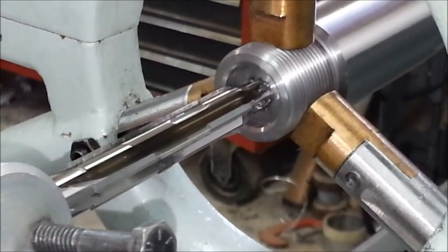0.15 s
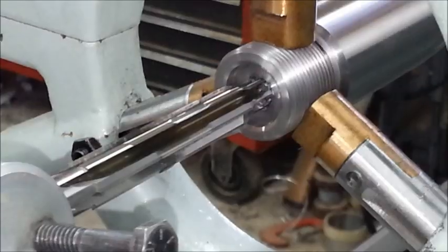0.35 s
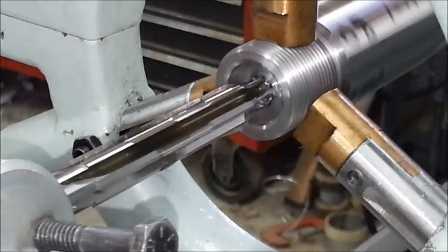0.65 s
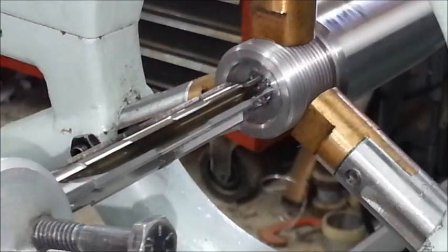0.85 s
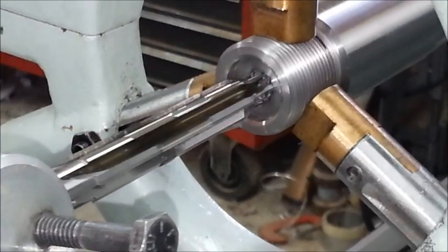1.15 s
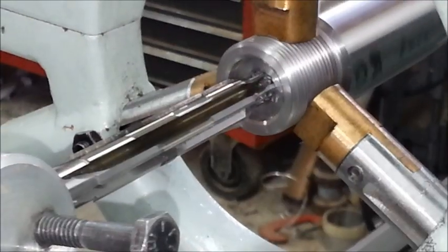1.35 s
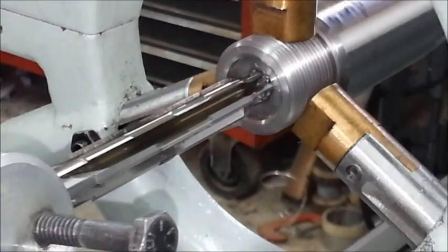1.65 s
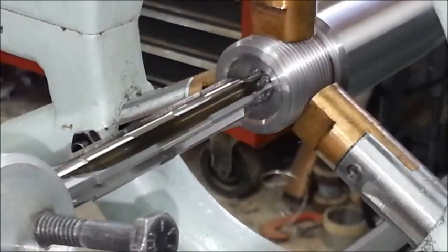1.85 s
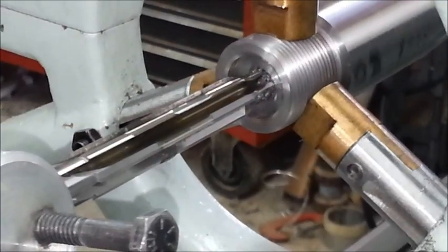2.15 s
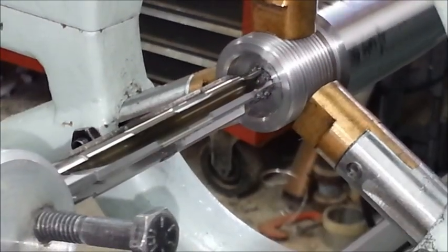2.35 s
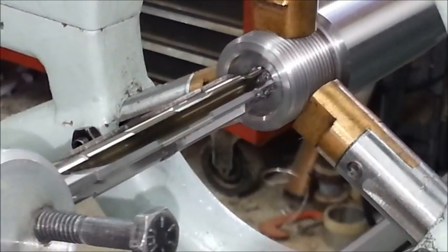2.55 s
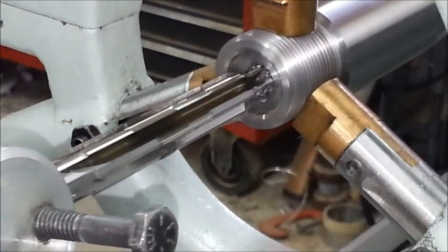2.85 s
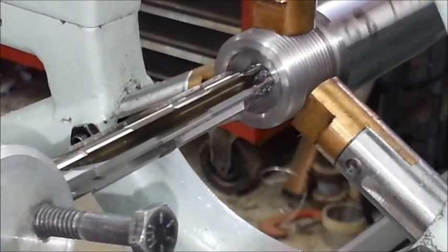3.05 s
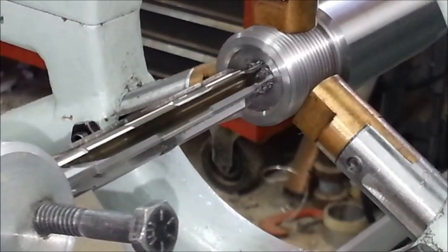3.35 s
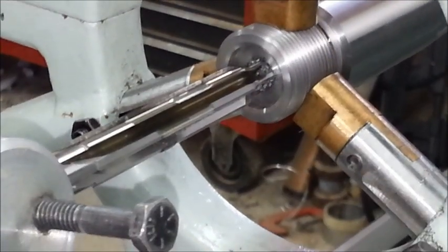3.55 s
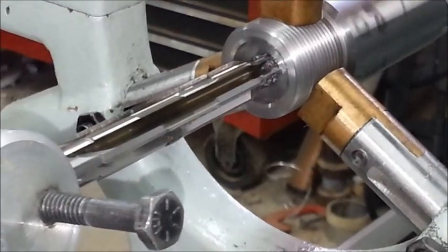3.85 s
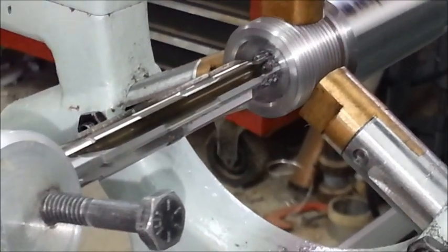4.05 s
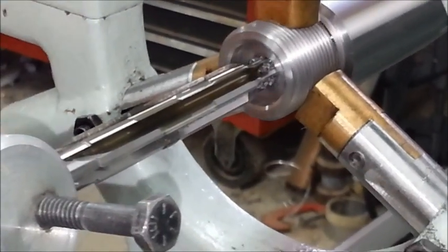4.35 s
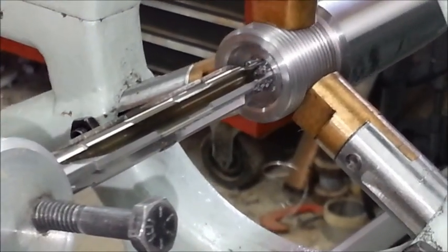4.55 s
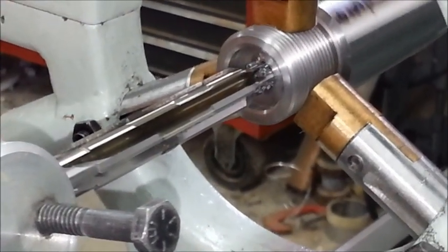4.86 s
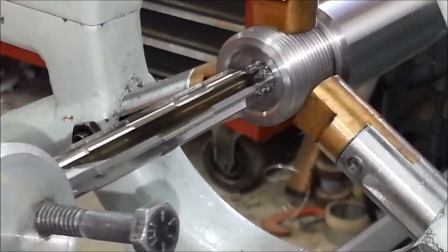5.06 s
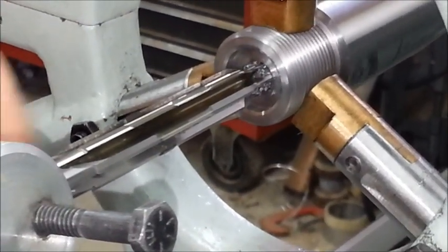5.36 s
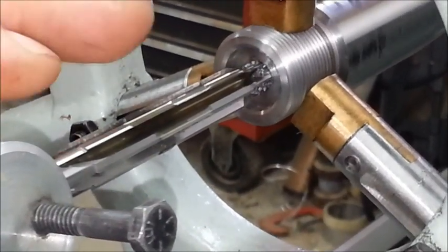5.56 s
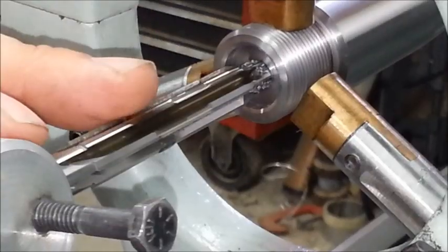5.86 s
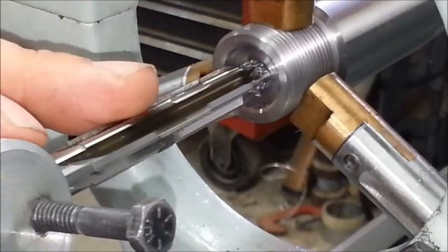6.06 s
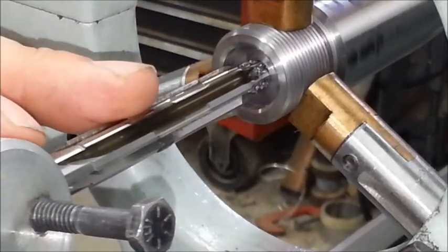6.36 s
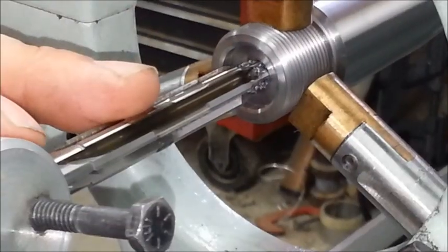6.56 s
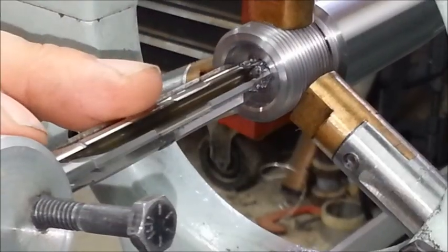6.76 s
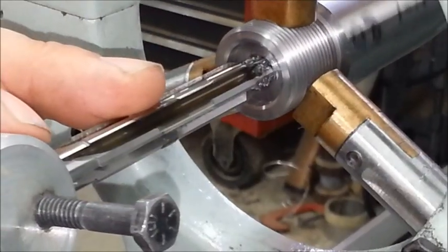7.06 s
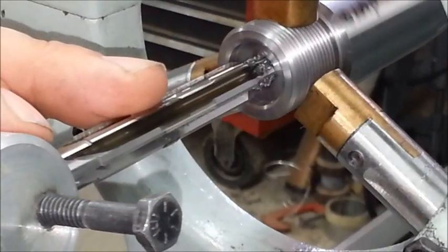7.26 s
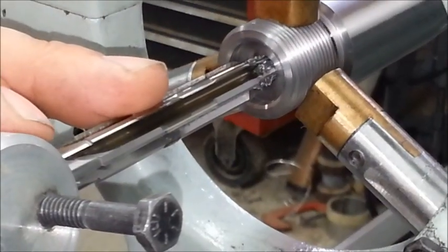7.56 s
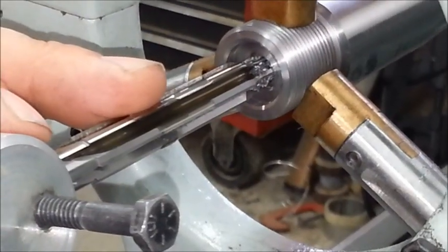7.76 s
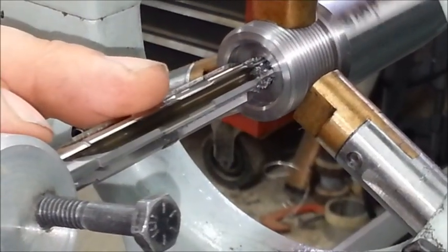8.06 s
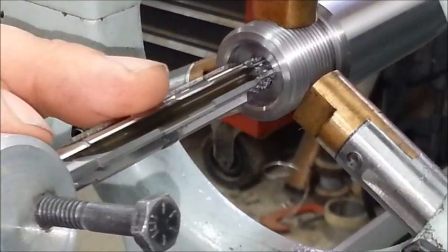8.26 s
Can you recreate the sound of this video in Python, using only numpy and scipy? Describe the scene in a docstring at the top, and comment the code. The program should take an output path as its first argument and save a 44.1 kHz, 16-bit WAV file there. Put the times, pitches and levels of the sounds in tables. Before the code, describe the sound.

Heard close in stereo, a slowly turning lathe drones with a wavering hum, gear whine and rattling teeth. Over it lies fine, grainy scraping of cutting edges on steel, with bright chip ticks and a pulsing metallic ring. Thin piercing squeaks thicken midway, then thin out; two small rising chirps pass before a final loud squeaky flurry. Light workshop echo.

```python
"""A metal lathe turns slowly in a workshop while a fluted reamer cuts into the end of a steel part, close by.
Throughout, the motor hums, gear teeth whine and knock, bearings and belt rumble, and the edges scrape and ring.
Five times a spindle turn an edge catches faintly; stronger high squeaks come and go, thickest at 3 to 5 s.
Chips tick now and then; soft scuffs pass near 2.9, 6.3 and 6.9 s, and two small chirps slide up near 5.5 s.
Strong squeaks are then rare until a loud burst of them from 8.1 s to the end."""
import sys
import numpy as np
from scipy import signal
from scipy.fft import rfft, irfft
from scipy.io import wavfile

SR = 44100
rng = np.random.default_rng(int(sys.argv[2]) if len(sys.argv) > 2 else 0)


def put_to_file(sound):
    """Save the sound as 16-bit audio at rate SR, in the file named by the first command-line argument."""
    columns = np.atleast_2d(sound).T  # one column per channel
    safe = np.clip(columns, -1, 1)
    whole_steps = np.round(safe * 32767)
    wavfile.write(sys.argv[1], SR, whole_steps.astype(np.int16))


N = 370881
TIME = np.arange(N) / SR
FREQ = np.maximum(np.arange(N // 2 + 1) * SR / N, 1)

MAGNET_HZ = 119.93  # magnetic pull of the motor, twice the mains rate
# repeat rates of the motor shaft, the pulley, the belt and the rubbing
SHAFT_HZ, PULLEY_HZ, BELT_HZ, RUB_HZ = 29.3, 6.21, 5.75, 7.05
SPINDLE_HZ = PULLEY_HZ / 5
# moments when the gears run tightest, the belt tugs hardest and an edge first catches
TIGHT_S, TUG_S, CATCH_S = 0.69, 0.085, .149


def undb(db):
    """Decibels to gain."""
    return 10 ** (np.asarray(db) / 20)


def unit(x):
    """Scale to rms 1."""
    return x / np.sqrt(np.mean(x ** 2))


def pan(db):
    """Left and right gains of equal total power for a level difference."""
    gains = undb(np.array([db, -db]) / 2).reshape(2, -1)
    return gains / np.sqrt(np.mean(gains ** 2, axis=0))


def walk(rate):
    """Smooth chance with spread 1 that changes about rate times a second."""
    size = 4096 if rate < 60 else N  # slow curves need few points
    smoothing = np.exp(-(FREQ[:size // 2 + 1] / rate) ** 2)
    steps = unit(irfft(rfft(rng.standard_normal(size)) * smoothing, size))
    return np.interp(TIME, np.linspace(0, TIME[-1], size), steps)


def follow(table):
    """Join rows of time and value into a curve at every sample."""
    return np.interp(TIME, *np.transpose(table))


def cycle(hz, peak_s):
    """A steady rise and fall between -1 and 1, with a top at the given time."""
    return np.cos(2 * np.pi * hz * (TIME - peak_s))


def over_freq(table):
    """Join the columns of a table into curves on a log-frequency axis."""
    hz, *columns = np.transpose(table)
    return [np.interp(np.log(FREQ), np.log(hz), column) for column in columns]


def colour(x, db, pan_db):
    """Give white sound of rms 1 a spectrum in dB per Hz and a left-right balance."""
    return irfft(rfft(x) * undb(db) * pan(pan_db) * np.sqrt(SR / 2), N)


def resonance(hz, width_hz, db):
    """How one springy part answers a push at each frequency."""
    return undb(db) / (1 + 1j * (FREQ ** 2 - hz ** 2) / (FREQ * width_hz))


def modes(spacing_hz):
    """The crowded resonances of a casting: a random ripple of spread 1 over frequency, for each side."""
    knots = np.arange(0, SR / 2, spacing_hz)
    return np.array([np.interp(FREQ, knots, unit(rng.standard_normal(len(knots)))) for _ in range(2)])


def turning(hz):
    """Roughness of a turning surface: two noises that come round again with every turn."""
    turn = rng.standard_normal((2, int(SR / hz)))
    return turn[:, np.arange(N) % turn.shape[1]]


def swell_band(x, centre_hz, reach_hz, db):
    """Let one band of a sound follow a level curve."""
    band = irfft(rfft(x) * np.exp(-((FREQ - centre_hz) / reach_hz) ** 4), N)
    return x + band * (undb(db) - 1)


def room(x, t60_s, wet_db):
    """Add the dense echoes of the lathe bed and the workshop, unrelated left and right."""
    t = TIME[:SR // 2]
    tail = rng.standard_normal((2, len(t))) * np.exp(-np.log(1000) * t / t60_s)
    tail /= np.sqrt(np.sum(tail ** 2, axis=1, keepdims=True))
    return x + undb(wet_db) * signal.fftconvolve(x, tail, axes=1)[:, :N]


# overtones of the hum: multiple of the magnetic pull [-], relative level/dB, left minus right [dB],
# left leads by [rad]
HUM_OVERTONES = [(1, 4, 1.5, .27), (2, -16, -6.2, -.79), (3, -7, 3, .11), (4, -20, -2.7, .73),
                 (5, -13.6, 5.7, .43), (6, -23.3, -2.4, 1.22), (7, -25.2, -3.4, .61), (8, -32, -7.3, 2),
                 (9, -26.5, 8.6, 1.89), (10, -33, 1, 0), (11, -35.5, 8.5, -.94), (12, -36, 2, 2.7)]
# load on the motor: t/s, hum level/dB before the overall trim
MOTOR_LOAD = [(0.1, -23), (2.93, -23), (3.11, -22.5), (4.9, -23), (8.09, -23), (8.3, -23)]


def motor(level_db=-3.5, waver_db=0.9, drift_rad=0.07, spread_rad=1.1):
    """The magnetic pull shakes the motor at twice the mains rate, with overtones that waver in level."""
    phase = 2 * np.pi * MAGNET_HZ * TIME + drift_rad * walk(1.0)
    out = 0
    for order, db, pan_db, lead in HUM_OVERTONES:
        # the fundamental wavers least
        sway = undb(waver_db * (1 - 1.25 / order) * walk(1.3))
        # the casing passes each high overtone on with its own delay
        late = spread_rad * max(order - 3, 0) ** 2
        ears = order * phase - late + np.array([[lead], [-lead]]) / 2
        out = out + np.sqrt(2) * undb(db) * pan(pan_db) * sway * np.sin(ears)
    return out * undb(follow(MOTOR_LOAD) + level_db)


# rolling noise of bearings and belt: f/Hz, level/dB [dB per Hz] before the resonance ripple
ROLLING_SPECTRUM = [(25, -86.5), (105, -74.5), (190, -67), (280, -67), (400, -69), (520, -70), (720, -70.5),
                    (1100, -73.5), (1500, -73.5), (1950, -76.5), (2400, -79.5), (2900, -80), (3300, -85),
                    (8000, -107)]
# its place between the ears: f/Hz, left minus right [dB], likeness of left and right [-1 to 1]
ROLLING_PLACE = [(25, -9, 0.39), (147, -10, 0.62), (260, 2.5, 0.92), (334, 19, 0.99), (494, -7, 0.58),
                 (830, 5.5, 0.49), (1040, -1, 0.11), (1470, 3.5, -0.72), (2270, 3.5, 0.99),
                 (3000, 8, -0.34)]


def drive(throb, level_db=0.03, buzz=0.029, flicker_db=0.77):
    """Bearings and belt roll on, largely repeating with each turn and buzzing with the motor's pull."""
    (db,), (pan_db, likeness) = over_freq(ROLLING_SPECTRUM), over_freq(ROLLING_PLACE)
    likeness = np.clip(likeness, -1, 1)
    rolling = rng.standard_normal((2, N)) + .42 * turning(SHAFT_HZ) + .7 * turning(PULLEY_HZ)
    ringing_db = 1.3 * modes(spacing_hz=22) * np.minimum(FREQ / 1200, 1)
    # mix a shared and an opposed part to set how alike the two sides are
    mid, side = rfft(unit(rolling))
    mid = mid * np.sqrt((1 + likeness) / 2)
    side = side * np.sqrt((1 - likeness) / 2)
    both_sides = irfft(np.array([mid + side, mid - side]), N)
    hum_buzz = 1 + buzz * np.sin(2 * np.pi * MAGNET_HZ * TIME)
    load = throb * hum_buzz * undb(level_db + flicker_db * walk(40))
    return colour(both_sides * load, db + ringing_db, pan_db)


# headstock resonances that the teeth knock on: f/Hz, width [Hz], relative level/dB
HEADSTOCK_MODES = [(130.6, 9.5, 4), (258, 17, -10), (368, 8, 7.5), (430, 7.8, -3.5), (462, 13.7, -3.5),
                   (610, 69, -16), (873, 94, -21.5)]


def rattle(tooth_hz=68.6, timing=0.176, level_db=-45, surge_db=2.4, pan_db=2):
    """Teeth take up their slack in unevenly timed knocks that ring the headstock casting."""
    count = 700
    at = ((np.arange(count) + timing * rng.standard_normal(count)) * SR / tooth_hz).astype(int)
    inside = (at >= 0) & (at < N)
    knocks = np.bincount(at[inside], minlength=N).astype(float)
    # neighbouring resonances push in opposite directions
    body = sum(resonance(*mode) * (-1) ** k for k, mode in enumerate(HEADSTOCK_MODES))
    return unit(irfft(rfft(knocks) * body, N)) * undb(level_db + surge_db * walk(6.3)) * pan(pan_db)


# shaft, gear and bearing tones: f/Hz, level/dB before swells, left minus right [dB]
GEAR_TONES = [(58.5, -53.0, 0), (142.7, -56.5, 0), (175.0, -54.5, 1), (197.8, -58.0, 1), (258.4, -55.0, 2),
              (281.3, -57.5, 5), (293.4, -50.5, 1), (310.9, -62.0, 10), (329.7, -53.0, 8),
              (341.8, -59.0, -1), (410.5, -48.5, 0), (425.3, -52.0, -1), (432.0, -48.0, -3),
              (456.2, -47.5, 0), (465.7, -51.5, -2), (538.3, -57.5, -7), (551.8, -63.0, -2),
              (567.9, -60.5, -1), (616.4, -57.0, -2), (643.3, -59.5, -5), (685.0, -57.5, 3),
              (698.5, -64.0, 7), (734.8, -60.0, -2), (757.7, -65.0, 11), (775.2, -59.5, 4),
              (807.5, -60.5, 0), (815.6, -63.5, 6), (827.7, -60.0, 5), (878.8, -57.0, 10),
              (895.0, -61.5, 11), (919.2, -61.0, 1), (1005.3, -62.5, 2), (1013.4, -65.5, 2),
              (1103.6, -63.5, 0), (1133.2, -64.5, 6), (1191.1, -63.0, -1), (1223.4, -54.0, 0),
              (1253.0, -62.5, 6), (1265.1, -65.5, 13), (1282.6, -61.0, 2), (1310.8, -58.5, 12),
              (1343.1, -62.0, 7), (1378.1, -57.5, -2), (1401.0, -62.5, 2), (1432.0, -50.0, 5),
              (1461.6, -62.5, -5), (1471.0, -53.5, 9), (1479.1, -64.0, 7), (1522.1, -64.0, 15),
              (1551.7, -56.0, 5), (1562.5, -51.0, 12), (1569.2, -63.5, 14), (1581.3, -61.0, 7),
              (1639.2, -64.5, 3), (1654.0, -61.5, 4), (1671.5, -62.5, -3), (1679.6, -66.5, 11),
              (1699.8, -65.0, 4), (1710.5, -65.5, 13), (1730.7, -65.5, 2), (1746.9, -62.0, 10),
              (1759.0, -58.5, 9), (1791.3, -66.0, 2), (1819.6, -63.0, -2), (1838.4, -66.5, 1),
              (1849.2, -62.5, 7), (1878.8, -58.5, -6), (1892.2, -61.5, 7), (1908.4, -62.0, 4),
              (1919.1, -63.0, 9), (1938.0, -62.5, 6), (2038.9, -63.5, 1), (2053.7, -62.5, 12),
              (2082.0, -64.0, 10), (2158.7, -64.5, 4), (2185.6, -62.0, 9), (2212.5, -61.0, 15),
              (2242.1, -65.0, 6), (2269.1, -63.0, 9), (2279.8, -59.5, 8), (2402.3, -64.0, 3),
              (2623.0, -62.0, 4), (2637.8, -58.5, 10), (2742.8, -54.5, 22), (2773.7, -67.5, 15),
              (2833.0, -69.0, 8), (2862.6, -63.5, 6), (2882.8, -68.5, 1), (2912.4, -58.0, 15),
              (2936.6, -68.5, 5), (2982.3, -56.5, 14), (3013.3, -68.5, 3), (3042.9, -69.0, 12),
              (3808.7, -58.0, 11), (3815.4, -65.5, 9), (3982.3, -66.0, 9), (4095.3, -66.5, 4),
              (4102.1, -62.0, 13), (4108.8, -65.5, 9), (4388.7, -65.0, 8), (4395.5, -62.0, 8),
              (4402.2, -66.0, 6), (4688.9, -65.0, 4)]


def gears(slip=0.00013, swell_db=1.0, swell_hz=1.4, flutter=0.23, flutter_hz=8, diffuse_hz=600):
    """Meshing teeth sing at the shaft's speed; tones swell and flutter as the load shifts between teeth."""
    turned = TIME + np.cumsum(slip * walk(3.6)) / SR
    out = np.zeros((2, N))
    for hz, db, pan_db in GEAR_TONES:
        # short waves reach the two sides out of step
        lead = min(hz / diffuse_hz, 2.0) * rng.uniform(.7, 1.3)
        cycles = hz * turned + rng.uniform()
        ears = np.float32(2 * np.pi * (cycles - np.floor(cycles))) + np.float32([[lead], [-lead]]) / 2
        # fine teeth feel the shifting load most
        unrest = min(hz / 1000, 1)
        swell = undb(db + swell_db * unrest * walk(swell_hz))
        fluttering = 1 + flutter * np.sqrt(unrest) * walk(flutter_hz)
        out += pan(pan_db) * np.sqrt(2) * swell * fluttering * np.sin(ears)
    return out


# swells of the chief gear whine, about one a spindle turn: t/s, rise above its slack level/dB
WHINE_SWELLS = [(.27, 5), (.85, 1), (1.5, 4), (2.37, 5), (3.28, 2), (3.95, -2), (4.75, 2), (5.55, 2),
                (6.42, 1), (7.22, 7), (7.9, 3)]
# low growl of the headstock: t/s, level/dB relative to its usual level
GROWL = [(0.0, -3), (.15, 1.5), (.55, 0), (1.1, 5.5), (1.3, -0.5), (1.78, 4), (2.6, 0), (2.92, 1.5),
         (3.2, -5), (3.62, 5.5), (3.85, 3), (4.3, 0.5), (4.7, 1), (5.1, 1.5), (5.45, -1.5), (5.8, 1.5),
         (6.7, -0.5), (7.8, 1), (8.08, 4), (8.4, -8)]


def headstock(throb, tight_db=0.5, slack_db=-2.0, swell_s=0.089):
    """The gear train: its middle swells each spindle turn, its growl surges, its chief whine comes and goes."""
    out = gears() + drive(throb) + rattle()
    whine_db = slack_db + sum(db * np.exp(-((TIME - s) / swell_s) ** 2 / 2) for s, db in WHINE_SWELLS)
    out = swell_band(out, 1900, 1000, tight_db * cycle(SPINDLE_HZ, TIGHT_S))
    out = swell_band(out, 442, 48, follow(GROWL))
    return swell_band(out, 1557, 40, whine_db)


# brief soft scuffs: t/s, f/Hz, level/dB at the peak of the swell
SOFT_SCUFFS = [(2.905, 1050, -43), (6.270, 1750, -47), (6.925, 830, -40)]


def scuffs(length_s=.012, width_hz=90):
    """Short rubs, each swelling and fading in one resonance."""
    out = 0
    for s, hz, db in SOFT_SCUFFS:
        rub = irfft(rfft(rng.standard_normal((2, N))) / (1 + ((FREQ - hz) / width_hz) ** 2), N)
        out = out + undb(db) * unit(rub) * np.exp(-((TIME - s) / length_s) ** 2 / 2)
    return out


# brief rising chirps: t/s, level/dB before echoes, half-length [s], first f/Hz, top f/Hz
RISING_CHIRPS = [(5.431, -40, .013, 1350, 1850), (5.493, -48, .007, 1500, 1790)]


def chirps(pan_db=3, glide_s=.005):
    """A short squeak slides up towards its top pitch as it swells and fades."""
    out = 0
    for s, db, length, first_hz, top_hz in RISING_CHIRPS:
        age = np.maximum(TIME - s + length, 0)
        pitch = top_hz + (first_hz - top_hz) * np.exp(-(age / glide_s) ** 2)
        swell = np.exp(-((TIME - s) / length) ** 4)
        out = out + np.sqrt(2) * undb(db) * swell * np.sin(2 * np.pi * np.cumsum(pitch) / SR)
    return room(out * pan(pan_db), t60_s=.33, wet_db=-11)


# chips that snap: t/s, relative level/dB
CHIP_SNAPS = [(.7195, -32), (.9975, -38), (3.053, -42), (3.36, -42), (3.39, -39), (3.524, -39),
              (3.582, -39), (3.741, -38), (4.335, -40), (4.777, -32), (5.1235, -32), (5.549, -33),
              (5.559, -41), (6.0338, -29), (8.076, -39), (8.314, -35)]


def chips(crumb_rate_hz=9, crumb_db=-51, scatter_db=3, level_db=1.8):
    """Each chip breaks with a tiny bright tick; finer crumbs break at random between them."""
    out = np.zeros((2, N))
    t = TIME[:SR // 50]
    chance = rng.standard_normal((300, 3))
    # two squared draws make a random wait between crumbs
    waits = (chance[:, 0] ** 2 + chance[:, 1] ** 2) / 2
    crumbs = list(zip(np.cumsum(waits) / crumb_rate_hz, crumb_db + scatter_db * chance[:, 2]))
    for s, db in list(CHIP_SNAPS) + crumbs:
        start = int(s * SR)
        tick = undb(db + level_db) * np.exp(-t / .0007) * rng.standard_normal((2, len(t)))
        if start + len(t) < N:
            out[:, start:start + len(t)] += tick
    bright = signal.butter(2, 7500, "high", fs=SR, output="sos")
    return room(signal.sosfilt(bright, out), t60_s=.12, wet_db=-3)


# ringing of the tool and the part: f/Hz, width [Hz], relative level/dB
TOOL_RESONANCES = [(2085, 50, 2), (2865, 45, 0), (4038, 22, 4.5), (4103, 14, 5), (4395, 22, -3),
                   (4550, 60, -5), (4690, 25, -2), (4915, 32, -1.5), (4975, 28, 2.5), (5280, 35, -7)]
# how strongly they ring: t/s, level/dB before the overall trim
RING_LEVEL = [(0, -49), (1.5, -48.5), (2.4, -47), (3.2, -50.5), (4.4, -52), (6.8, -45.5), (8.4, -50.5)]


def ringing(tug_db=2.5, flicker_db=1.9, level_db=-1, pan_db=5):
    """Rubbing rings the tool and the part; it largely repeats, and rises and falls with the belt's tug."""
    body = sum(resonance(*mode) for mode in TOOL_RESONANCES)
    rub = rng.standard_normal((2, N)) + 1.3 * turning(RUB_HZ)
    rub = rub * undb(tug_db * cycle(BELT_HZ, TUG_S) + flicker_db * walk(26))
    return unit(irfft(rfft(rub) * body, N)) * undb(follow(RING_LEVEL) + level_db) * pan(pan_db)


# scraping of the cutting edges: f/Hz, level/dB [dB per Hz] before the resonance ripple, left minus right [dB]
SCRAPE_SPECTRUM = [(2000, -100, 3), (3410, -84, -0.5), (3860, -78.5, 5), (4240, -80.5, -3),
                   (4600, -83, 3.5), (4910, -77.5, 1.5), (5300, -84, 0), (6300, -82.5, -1), (7350, -79, -9),
                   (8180, -84.5, -4), (9400, -89, 1.5), (10300, -90, -2), (11450, -100, 2),
                   (12100, -95, 3.5), (14400, -101, 1.5)]


def scrape(throb, grain_db=0.9, grain_hz=1500, flicker_db=0.5):
    """The edges shear the steel in countless tiny slips, heard as grainy noise."""
    db, pan_db = over_freq(SCRAPE_SPECTRUM)
    ringing_db = 1.3 * modes(spacing_hz=45)
    surface = rng.standard_normal((2, N)) + .5 * turning(RUB_HZ)
    slips = surface * undb(grain_db * walk(grain_hz) + flicker_db * walk(25))
    return colour(unit(slips * throb), db + ringing_db, pan_db)


def catches(level_db=-59, length_s=.014, spread_db=3, pitch_hz=9180):
    """An edge also catches faintly with every turn of the pulley: rows as in STRONG_SQUEAKS."""
    sides = rng.standard_normal(int(N / SR * PULLEY_HZ))
    return [(CATCH_S + turn / PULLEY_HZ, level_db, length_s, spread_db * side, pitch_hz)
            for turn, side in enumerate(sides)]


# squeaks of the catching edges: t/s, level/dB before trim and echoes, length scale [s],
# left minus right [dB], middle f/Hz
STRONG_SQUEAKS = [(.157, -52, 0.016, 0, 9180), (.625, -49.5, .016, 0, 9120), (0.948, -40.5, .011, 4, 9060),
                  (1.007, -27, 0.017, 10, 9000), (1.075, -35, .012, -1, 9110), (1.12, -39, 0.022, 8, 9110),
                  (1.152, -50, .014, 3, 9100), (1.761, -41, .022, 2, 9140), (1.805, -41, 0.022, 1, 9090),
                  (1.92, -55, .04, 0, 9170), (2.081, -42.5, 0.018, -10, 9190), (2.233, -45, .01, -3, 9150),
                  (2.724, -37, 0.018, -7, 9190), (2.771, -51, .016, 0, 9120),
                  (2.885, -44, 0.026, -10, 9200), (3.041, -36.5, .012, 2, 9100), (3.25, -46, .017, 6, 9070),
                  (3.365, -35, 0.014, 1, 9120), (3.412, -30.5, 0.032, -1, 9080),
                  (3.495, -44, 0.012, -10, 9170), (3.524, -35, 0.013, 2, 9150), (3.580, -43, .012, 3, 9120),
                  (3.698, -38, 0.024, -4, 9120), (3.74, -26, 0.018, 3, 9070), (3.808, -50, .018, -6, 9070),
                  (3.844, -39.5, .014, 2, 9120), (3.892, -50, .013, 0, 9090), (4.014, -41, .014, 1, 9070),
                  (4.178, -33.5, 0.018, 0, 9130), (4.222, -34, 0.026, 2, 9090), (4.27, -51, .014, 0, 9120),
                  (4.304, -46, .01, -12, 9140), (4.336, -33, 0.019, 3, 9170), (4.377, -29, 0.013, 9, 9100),
                  (4.418, -48, .016, -2, 9120), (4.494, -33.5, 0.017, 1, 9160),
                  (4.541, -35, 0.014, 0, 9110), (4.652, -37, .012, 1, 9100), (4.82, -48, .012, 0, 9200),
                  (4.982, -49, .014, 0, 9200), (5.02, -46, .02, 2, 9190), (5.143, -35.5, .015, -4, 9260),
                  (5.462, -51, .014, 0, 9230), (5.952, -44, .018, 6, 9300), (6.113, -56, .012, 0, 9330),
                  (8.081, -25, 0.016, 5, 9170), (8.13, -43.5, .028, 0, 9170), (8.2, -33, 0.0087, 6, 9050),
                  (8.227, -22, 0.013, 8, 9110), (8.245, -17.5, 0.014, 3, 9110), (8.266, -28, .009, 4, 9060),
                  (8.279, -37, 0.0079, 4, 9080), (8.314, -25.5, 0.012, 0, 9080),
                  (8.325, -26, .011, -3, 9170), (8.364, -24, 0.016, 4, 9130),
                  (8.405, -15.5, 0.012, 9, 9030)]


def squeaks(level_db=-0.3, wobble_hz=24, wobble_rate_hz=50, rough_db=2.5, rough_hz=130,
            sag_hz=35, arch_hz=70, rise=0.35, fall=0.48, bite=1.6):
    """An edge sticks and slips, driving one high mode of the reamer; pitch lifts with force and sags in time."""
    out = np.zeros((2, N))
    wobble, rough = wobble_hz * walk(wobble_rate_hz), undb(rough_db * walk(rough_hz))
    events = list(STRONG_SQUEAKS) + catches()
    # so short a wave reaches the two sides a little differently each time
    leads = rng.normal(-1, .4, len(events))
    for (s, db, length, pan_db, hz), lead in zip(events, leads):
        span = slice(max(int((s - .1) * SR), 0), int((s + .1) * SR))
        # rise, fall and bite count in lengths of this squeak
        age = (TIME[span] - s) / length
        # the edge bites suddenly; the vibration grows and dies away
        grip = np.exp(-(np.minimum(age, 0) / bite) ** 6)
        swell = grip / np.cosh(age / np.where(age < 0, rise, fall))
        pitch = hz + wobble[span] - sag_hz * np.tanh(age) + arch_hz * (swell - .8)
        ears = 2 * np.pi * np.cumsum(pitch) / SR + np.array([[lead], [0]])
        size = np.sqrt(2) * undb(db + level_db) * swell * rough[span]
        out[:, span] += pan(pan_db) * size * np.sin(ears)
    return room(out, t60_s=.33, wet_db=-15)


def scene(throb_db=0.18):
    """The running machine and the cut together; drive and scrape throb a little with each pulley turn."""
    throb = undb(throb_db * cycle(PULLEY_HZ, CATCH_S))
    machine = motor() + headstock(throb) + scuffs() + chirps()
    cut = chips() + ringing() + scrape(throb) + squeaks()
    return machine + cut


def record(dry, top_hz=14550):
    """Cut the highest treble away steeply."""
    return signal.sosfilt(signal.ellip(10, .1, 80, top_hz, fs=SR, output="sos"), dry)


dry = scene()
out = record(dry)
put_to_file(out)
```